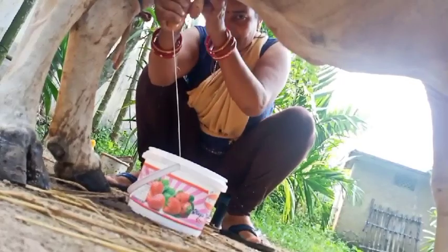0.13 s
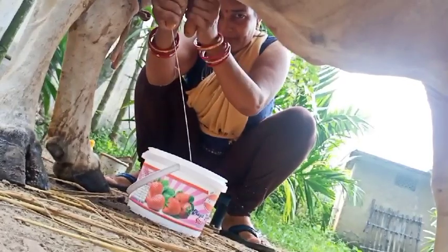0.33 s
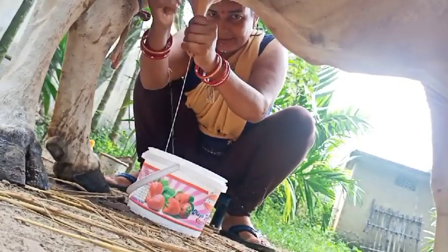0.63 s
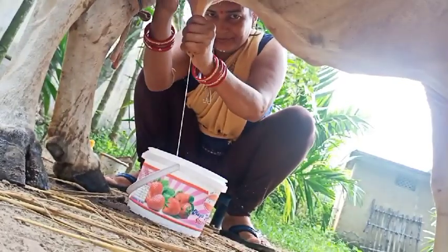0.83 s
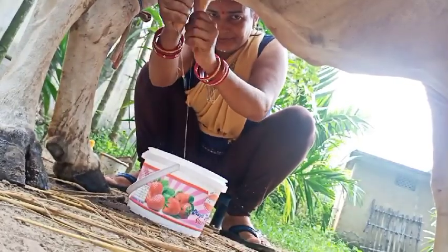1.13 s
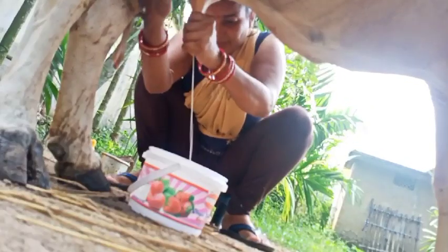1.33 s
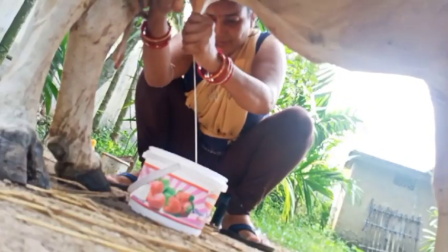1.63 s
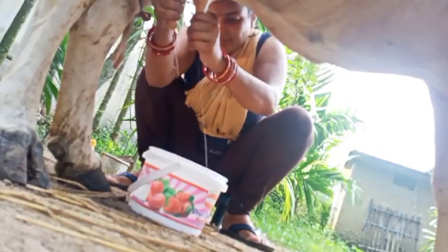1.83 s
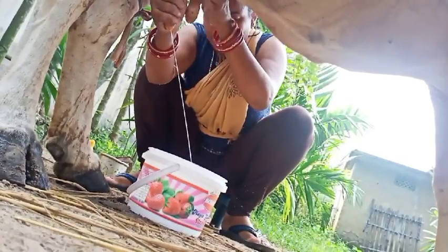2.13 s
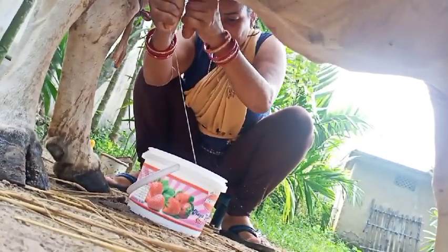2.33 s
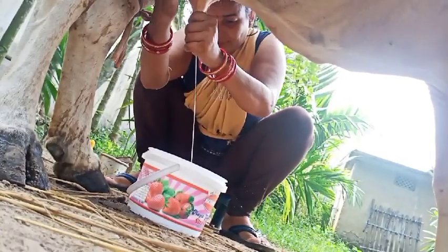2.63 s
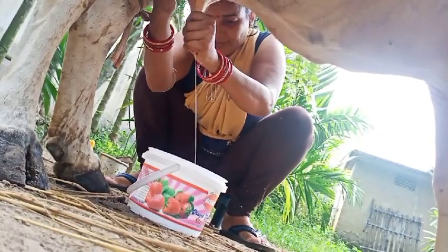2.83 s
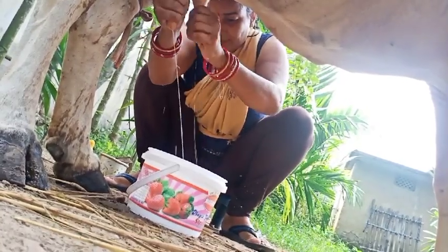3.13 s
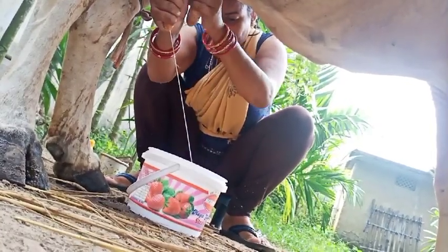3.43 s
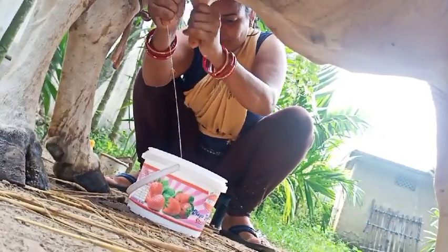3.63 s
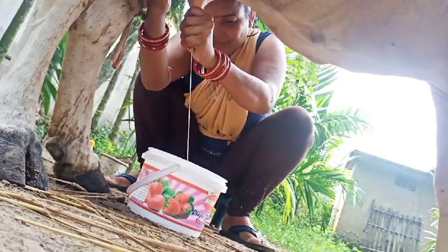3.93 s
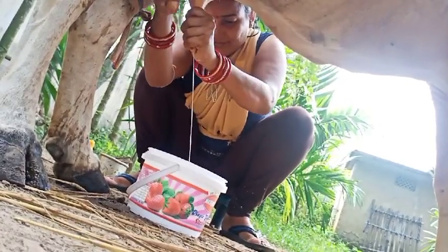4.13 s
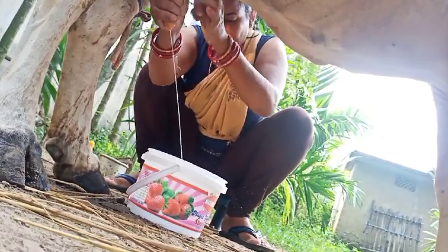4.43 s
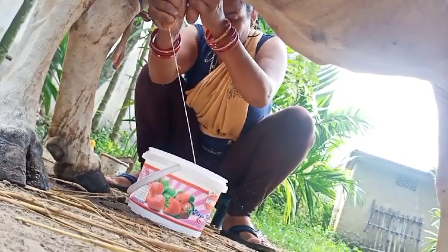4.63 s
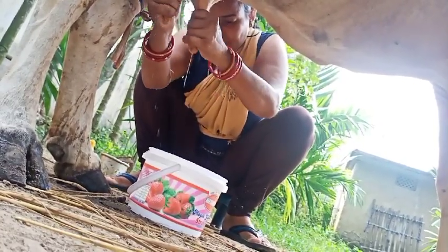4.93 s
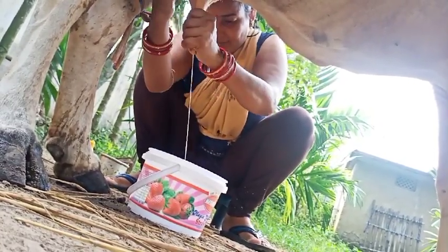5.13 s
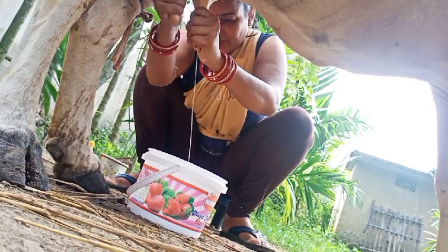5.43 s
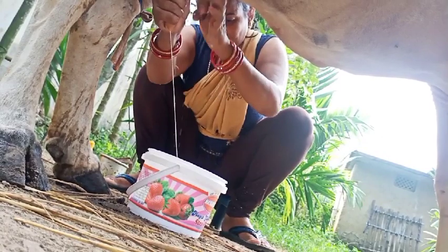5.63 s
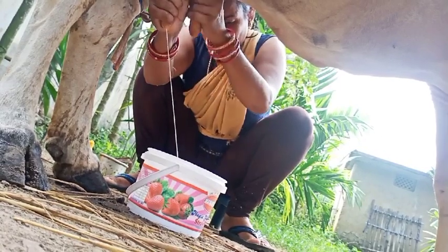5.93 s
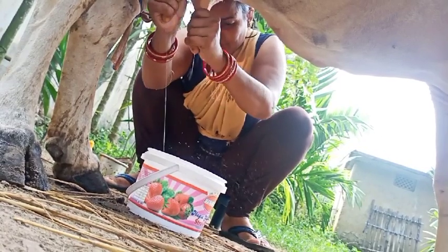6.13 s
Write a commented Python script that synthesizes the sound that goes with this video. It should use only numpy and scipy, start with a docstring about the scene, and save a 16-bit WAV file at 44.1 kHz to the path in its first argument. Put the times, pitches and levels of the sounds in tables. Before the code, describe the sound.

Milk jets squirt in uneven rhythmic spurts into a frothy plastic tub, with bangles clinking and soft open air behind, heard close up.

```python
"""Hand milking in an open shelter

A cow is milked by hand into a plastic tub, heard from close by, with soft open air and faint tones far off.
Each jet is noise-driven: random drops strike resonances of wall, froth and thin plastic, plus a fine spray.
Fat drops slap as noise bursts, single drips ring as short notes and the tub gives dull low knocks.
The bangles on the milker's wrists clink: ringing modes with bursts of coloured noise."""
import sys
import numpy as np
from scipy import signal
from scipy.fft import rfft, irfft
from scipy.io import wavfile
from scipy.ndimage import uniform_filter1d

SR = 44100
rng = np.random.default_rng(int(sys.argv[2]) if len(sys.argv) > 2 else 0)


def unload_audio(sound):
    """Save the sound as a 16-bit wav file, at the path given as the first command line argument."""
    columns = np.transpose(np.atleast_2d(sound))
    # keep every value between -1 and 1, then stretch to whole-number steps
    steps = np.round(np.clip(columns, -1, 1) * 32767)
    wavfile.write(sys.argv[1], SR, steps.astype(np.int16))


N = 276507
TIME = np.arange(N) / SR  # seconds

# Colour of the open air. Each row: frequency in Hz, relative level in dB per Hz.
AIR_COLOUR = [(25, -65), (70, 3), (150, -0.5), (350, -2), (600, -2.5), (1400, -4.5), (3500, -21),
              (5800, -17), (7000, -1.5), (8600, 1), (9400, -15.5), (13600, -26), (15200, -8), (15900, -37)]
AIR_DB = -56.5  # middle level of the air's hiss
# Low hum behind the shelter. Each row: time in seconds, level in dB.
HUM_LEVEL = [(0.0, -58), (1.5, -59), (1.7, -79), (3.2, -76), (4.3, -63), (6.27, -65)]
# Faint far tones. Each row: start in seconds, end in seconds, frequency in Hz, level in dB.
FAR_TONES = [(1.14, 1.207, 440, -56), (1.62, 1.67, 650, -41.5), (1.925, 1.975, 562.4, -47),
             (2.13, 3.02, 621.8, -53.5), (2.216, 2.625, 887, -57.5), (3.752, 3.995, 629, -46.5),
             (3.734, 3.93, 360, -52.5), (4.805, 4.97, 430.4, -54.5)]

# Resonances of the tub's floor, of its wall, of the air in it, and the thin wall's clearest high rings.
# Each row: frequency in Hz, width in Hz, relative level in dB.
FLOOR_MODES = [(154, 260, -5), (249, 62, 2.5), (360, 19, 0.5), (425, 37, -8)]
WALL_MODES = [(545, 55, -3.5), (569.4, 71, 5), (670, 80, 2.5), (755, 134, -7), (905, 156, -2.5)]
HOLLOW_MODES = [(1085, 80, -0.5), (1186, 430, -7.5), (1446, 103, 1.5), (1770, 213, -5), (2087, 237, -1),
                (2448, 410, -4), (2810, 730, -4.5)]
WALL_RING_MODES = [(2827, 60, 2), (4150, 104, 1), (6304, 106, 3.5), (7416, 110, 5.5)]
# Dull knocks of the tub. Each row: start in seconds, level in dB before rise and decay, pitch in Hz,
# time to fall by 60 dB in seconds.
TUB_KNOCKS = [(1.751, -31, 345, 0.16), (1.759, -37, 209, 0.11), (1.793, -33, 357, 0.12),
              (2.672, -32, 335, 0.14), (3.237, -38, 349, 0.06), (3.549, -28.5, 343, 0.12),
              (4.042, -27, 373, 0.13), (4.263, 0, 395, 0.01), (4.268, -20.5, 170, 0.049),
              (4.48, -42, 248.2, 0.27), (4.649, -30, 264, 0.19), (4.713, -29, 224, 0.096),
              (4.775, -26.5, 270, 0.083), (5.637, -40.5, 252, 0.24), (5.96, -27.5, 347, 0.11),
              (5.976, -24, 219, 0.031), (6.011, -26, 425, 0.049)]

# Touches of the bangles. Each row: start in seconds, then levels in dB of the clear ring,
# the hard clack and the high tinkle.
BANGLE_TOUCHES = [(0.121, -39, -42, -28), (0.1282, -27, -27, -31), (0.538, -37, -32, -32.5),
                  (0.545, -25, -19, -12), (0.564, -36, -12, -20), (1.13, -35.5, -38, -47),
                  (1.364, -50, -40, -18.5), (1.986, -29.5, -36, -48), (2.55, -48, -34, -33),
                  (2.568, -46, -12, -49), (3.305, -28.5, -32, -30), (3.745, -39, -36, -24),
                  (3.772, -34, -17.5, -26.5), (3.92, -63, -25.5, -43), (4.402, -34.5, -33, -46),
                  (4.472, -37, -32, -19.5), (4.921, -41, -31, -22.5), (4.9355, -33, -29, -24),
                  (4.962, -27.5, -13, -28), (5.743, -29, -30, -19.5), (6.159, -53, -22, -30),
                  (6.165, -29, -17, -16.5), (6.203, -35, -11, -36)]
# Clear modes of a bangle. Each row: frequency in Hz, relative level in dB, time to fall by 60 dB in seconds.
BANGLE_MODES = [(6710, 0, .085), (12810, -5, .05)]
# Colours of clack and tinkle, with the microphone's own peak near 15 kHz.
# Each row: frequency in Hz, relative level in dB per Hz.
CLACK_COLOUR = [(2000, -19.5), (4800, -8.5), (6200, 6), (7500, 10.5), (8500, 10.5), (9500, 2), (10600, 1.5),
                (13000, -23), (16000, -10)]
TINKLE_COLOUR = [(10000, -14), (13800, 10), (14500, -5), (15200, 30), (15500, 8), (15900, -25)]
RATTLE_DB = -13  # start of the rattle, relative to the peak of the clack's envelope

# Single bubbles and drips around the spurts. Each row: start in seconds, level in dB before rise and decay,
# pitch in Hz.
DRIPS = [(0.15, -36, 3330), (0.714, -44, 2480), (0.748, -37, 2805), (1.166, -46, 1430), (2.574, -53, 1440),
         (2.797, -24, 1090), (3.025, -38.5, 1050), (3.104, -44, 1400), (3.742, -44, 1287)]
# Fat drops and short gushes on the plastic. Each row: start in seconds, relative level in dB,
# centre of the note in Hz, decay time constant in seconds.
FAT_DROPS = [(0.034, -27.5, 6970, 0.0041), (0.244, -20, 2290, 0.0073), (0.299, -19.5, 2130, 0.0097),
             (0.384, -18, 1220, 0.0028), (0.411, -18, 6200, .004), (0.824, -12, 1940, 0.0096),
             (0.847, -12, 1690, .004), (0.884, -18.5, 700, 0.012), (0.958, -19, 2830, .005),
             (1.052, -15, 1390, .008), (1.408, -19.5, 3000, 0.022), (2.155, -16.5, 7330, 0.0053),
             (2.166, -19, 3180, 0.0065), (2.189, -17.5, 7300, 0.0024), (2.217, -23, 1930, 0.013),
             (2.249, -15.5, 10300, 0.0045), (2.266, -19.5, 6500, 0.0046), (2.882, -10.5, 2130, 0.018),
             (2.939, -17.5, 7100, 0.017), (3.289, -31, 7500, 0.0058), (3.415, -14, 660, 0.0053),
             (3.492, -19, 1310, .004), (3.573, -12.5, 5760, 0.002), (3.957, -15.5, 8940, 0.0044),
             (3.99, -11, 2190, 0.012), (4.194, -8, 2010, 0.014), (4.637, -16.5, 660, 0.0059),
             (4.669, -11, 2540, .003), (4.716, -8.5, 2140, 0.0065), (4.784, -13, 1680, 0.0021),
             (5.184, -13, 7160, 0.007), (5.231, -10, 2060, 0.0088), (5.257, -11.5, 7040, 0.024),
             (5.304, -9, 2080, 0.0045), (5.783, -13, 6950, 0.0028), (6.003, -12.5, 620, 0.008)]

# Colours of splash and spray, with the microphone's own peak near 15 kHz.
# Each row: frequency in Hz, relative level in dB per Hz.
SPLASH_COLOUR = [(1800, -23.5), (2900, 1.5), (3900, -0.5), (4800, 2), (6000, 9), (7400, 8), (8500, 1.5),
                 (9800, -23), (12000, -25)]
SPRAY_COLOUR = [(7000, 2), (9300, -13), (11000, -12.5), (12500, -20), (13800, -13), (14600, -1),
                (15300, 8.5), (15600, 2), (15950, -30), (17000, -58)]
# One spurt for each pull on a teat (a few break in two), with weak dribbles between.
# Each row: start of full flow in seconds, time held in seconds, then relative levels in dB at mid-spurt of
# drumming, churning, splash and fine spray, sag in dB per second (each part adds its own),
# seconds until the jet is fully in the froth (negative: it plunges in sooner), the pit's pitch in Hz
# at mid-spurt and its relative level in dB, treble and crackle of the splash in dB.
TEAT_PULLS = [(0.02, 0.024, -62, -52.5, -55.5, -62, 0, -0.0039, 1410, -30, 5, 2),
              (0.204, 0.07, -45, -34, -40, -40, -13, 0.037, 2140, -11, 2.5, -1),
              (0.315, 0.1, -40.5, -36.5, -38.5, -42.5, 12, -0.018, 1350, -8, 2, 3),
              (0.484, 0.062, -85, -42.5, -49.5, -52, 10, -0.012, 2250, 8, 2.5, 2),
              (0.803, 0.077, -44, -27, -29.5, -41.5, 3, 0.039, 1620, -19, 2.5, -1.5),
              (0.952, 0.13, -49.5, -31.5, -39, -49, 80, 0.003, 1400, -5, 2, 3),
              (1.15, 0.042, -57.5, -55.5, -75, -66, 63, 0.003, 1400, -5, 15, -4),
              (1.355, 0.045, -66, -37, -43.5, -49, 5, -0.039, 2210, 11, -2, 9),
              (1.42, 0.12, -70, -31, -40.5, -41, -7, -0.005, 2240, 1.5, 1, 0),
              (1.691, 0.14, -50.5, -31.5, -46, -46, -10, -0.022, 2160, 1, 7, 4),
              (2.1, 0.01, -58.5, -53, -59, -58, 2, -0.046, 2180, 4, 11, 4),
              (2.158, 0.1, -58, -44.5, -40, -41, 12, 0.011, 1500, -12, -1, 1),
              (2.322, 0.072, -46.5, -32.5, -44, -51, 57, 0.007, 1690, -2, -2, -7),
              (2.753, 0.2, -46.5, -27.5, -41, -41, -18, -0.02, 2050, 0.5, 9, -3),
              (3.005, 0.044, -58.5, -36.5, -49, -52, 64, 0.003, 2130, 4.5, 7, 5),
              (3.148, 0.059, -69, -55.5, -53.5, -52, -13, 0.005, 2400, 1, 6, -1),
              (3.317, 0.17, -32, -34, -43.5, -39, -4, 0.05, 1390, -16, -0.5, 2),
              (3.539, 0.032, -40.5, -36.5, -39, -70, 3, 0.02, 1430, -12, 0, -1),
              (3.978, 0.23, -31, -30, -36, -38.5, 2, 0.012, 1990, -3.5, 3, 4.5),
              (4.523, 0.13, -34, -34.5, -36.5, -34, -64, 0.034, 2380, -9, -9, -2),
              (4.719, 0.048, -47, -32, -35.5, -65, 29.5, 0.0028, 2340, -11, -7, 1),
              (5.19, 0.27, -23, -19.5, -35.5, -39.5, 26, 0.097, 2157, -4, -7, -1),
              (5.76, 0.32, -35, -36, -45, -47.5, 15, 0.019, 2110, -29, -1.5, -5)]
# How each part follows a pull: attack in seconds, release time constant in seconds, extra sag in dB per
# second, and level in dB of the thin thread that runs ahead of the jet.
DRUM_SWELL = dict(attack_s=0.06, release_s=.046, sag_db_per_s=-11, thread_db=-29)
CHURN_SWELL = dict(attack_s=0.065, release_s=0.037, sag_db_per_s=16, thread_db=-31)
SPLASH_SWELL = dict(attack_s=0.071, release_s=0.045, sag_db_per_s=-3, thread_db=-8.5)
SPRAY_SWELL = dict(attack_s=0.071, release_s=0.067, sag_db_per_s=2, thread_db=-1)
THREAD_LEAD_S = 0.041  # time constant of the thread's growth
PIT_RISE_HZ_PER_S = 520  # the pit's note climbs while the jet digs into the froth
BRIGHT_FROM_HZ = 6430  # above this, the splash brightens or dulls with the spot that the jet hits
CRACKLE_UP_TO_HZ = 4840  # below this lies its crackle
STOP_FROM_HZ = 16800  # from here up, the sound is cut by at least 60 dB


def from_db(db):
    """Decibels to gain."""
    return 10 ** (np.asarray(db) / 20)


def rms_one(x):
    """Scale to unit rms."""
    return x / np.sqrt(np.mean(x ** 2) + 1e-20)


def level(rows, fade_s=0.004):
    """Gain along a curve of (s, dB), fading out beyond its ends."""
    rows = np.array(rows)
    outside = np.maximum(0, np.maximum(rows[0, 0] - TIME, TIME - rows[-1, 0]))
    return from_db(np.interp(TIME, rows[:, 0], rows[:, 1])) * np.exp(-outside / fade_s)


def drift(rate):
    """Random line of unit rms with `rate` new values a second, joined by straight slopes."""
    knots = rng.standard_normal(4096)
    return rms_one(np.interp(TIME * rate, np.arange(len(knots)), knots))


def band(x, low_hz, high_hz, order=2):
    """Butterworth band-pass."""
    sos = signal.butter(order, [low_hz, high_hz], "band", fs=SR, output="sos")
    return signal.sosfilt(sos, x + 1e-18)


def split(x, hz):
    """The parts below and above a frequency."""
    return [signal.sosfilt(signal.butter(3, hz, kind, fs=SR, output="sos"), x) for kind in ("low", "high")]


def colour(x, spectrum):
    """Causal (minimum-phase) filter with the given spectrum, made by folding its cepstrum."""
    hz, db = np.transpose(spectrum)
    size = 4096
    grid = np.arange(size // 2 + 1) * SR / size + 1
    gain = from_db(np.interp(np.log(grid), np.log(hz), db))
    cepstrum = irfft(np.log(gain))
    cepstrum[1:size // 2] *= 2
    cepstrum[size // 2 + 1:] = 0
    response = irfft(np.exp(rfft(cepstrum)))
    return signal.oaconvolve(x, response)[:N]


def resonate(x, hz, width_hz):
    """Two-pole resonance with gain about 1 on top."""
    r = np.exp(-np.pi * width_hz / SR)
    zeros = np.array([1, 0, -1]) * (1 - r * r) / 2
    poles = [1, -2 * r * np.cos(2 * np.pi * hz / SR), r * r]
    return signal.lfilter(zeros, poles, x + 1e-18)


def outdoors(tone_width_hz=22, hum_hz=66, hum_width_hz=16):
    """Open air as coloured noise, a low hum as resonant noise and faint blurred tones from far off."""
    air = rms_one(colour(rng.standard_normal(N), AIR_COLOUR))
    out = from_db(AIR_DB + drift(24)) * air
    hum = resonate(rng.standard_normal(N), hum_hz, hum_width_hz)
    out += level(HUM_LEVEL) * rms_one(resonate(hum, hum_hz, hum_width_hz))
    for start, end, hz, db in FAR_TONES:
        haze = rms_one(band(rng.standard_normal(N), hz - tone_width_hz, hz + tone_width_hz))
        tone = np.sin(2 * np.pi * hz * TIME) + 0.5 * haze
        out += level([(start, db), (end, db)], fade_s=0.015) * tone
    return out


def shelter(x, t60=0.061, wet_db=-15.5, gap_s=0.0051):
    """Short, thin scatter from the ground, the cow and the roof, as decaying noise after a gap."""
    t = TIME[:SR // 2]
    noise = band(rng.standard_normal(len(t)), 370, 5400, order=1)
    echoes = noise * from_db(-60 * t / t60) * (t > gap_s)
    return x + from_db(wet_db) * signal.fftconvolve(x, echoes / np.linalg.norm(echoes))[:N]


def knocks(rise_s=0.0048, rough=0.49, slosh_spread=1.32):
    """Soft blows on the tub: one low, quickly damped note each, blurred by the sloshing milk."""
    out = np.zeros(N)
    for s, db, hz, t60 in TUB_KNOCKS:
        start = int(s * SR)
        t = TIME[:N - start][:SR // 3]
        slosh = rms_one(band(rng.standard_normal(len(t)), hz / slosh_spread, hz * slosh_spread))
        note = np.sin(2 * np.pi * hz * t) + rough * slosh
        out[start:start + len(t)] += from_db(db - 60 * t / t60) * (1 - np.exp(-t / rise_s)) * note
    return out


def bangles(clack_s=0.00084, rattle_s=0.012, tinkle_rise_s=0.0013, tinkle_s=0.01, tinkle_body_db=-9,
            ring_rise_s=0.0011):
    """Stacked rings touch: a hard clack with a short rattle, a softer high tinkle, and one ring sounds on."""
    out, t = np.zeros(N + SR), TIME[:SR // 6]
    strike = t / clack_s * np.exp(1 - t / clack_s) + from_db(RATTLE_DB) * np.exp(-t / rattle_s)
    chatter = (1 - np.exp(-t / tinkle_rise_s)) * np.exp(-t / tinkle_s)
    for s, ring_db, clack_db, tinkle_db in BANGLE_TOUCHES:
        ring = np.zeros(len(t))
        for hz, db, t60 in BANGLE_MODES:
            touched_hz = hz + rng.normal(0, 29)  # each touch is tuned a little differently
            ring += from_db(db - 60 * t / t60) * np.sin(2 * np.pi * touched_hz * t)
        clink = from_db(ring_db) * (1 - np.exp(-t / ring_rise_s)) * ring
        bursts = [(clack_db, CLACK_COLOUR, strike),
                  (tinkle_db, TINKLE_COLOUR, chatter),
                  (tinkle_db + tinkle_body_db, CLACK_COLOUR, chatter)]
        for db, spectrum, shape in bursts:
            touch = colour(rng.standard_normal(len(t)) * shape, spectrum)[:len(t)]
            clink += from_db(db) * touch / np.abs(touch).max()
        start = int(s * SR)
        out[start:start + len(t)] += clink
    return band(out[:N], 1100, 19845)


def plinks(t60=0.16, rise_s=0.0044, rough=0.31):
    """Bubbles and drips: one short decaying note each, blurred by the moving milk."""
    out, t = np.zeros(N + SR), TIME[:SR // 5]
    for s, db, hz in DRIPS:
        blur = rms_one(resonate(rng.standard_normal(len(t)), hz, hz / 10))
        note = np.sin(2 * np.pi * hz * t) + rough * blur
        start = int(s * SR)
        out[start:start + len(t)] += from_db(db - 60 * t / t60) * (1 - np.exp(-t / rise_s)) * note
    return out[:N]


def slaps(gain_db=-5.0, rise_share=0.16, spread=1.145, crack_db=-9):
    """A fat drop bursts with a broad crackle and a short note; the longer the gush, the softer its start."""
    out, t = np.zeros(N + SR), TIME[:SR // 8]
    for s, db, hz, decay_s in FAT_DROPS:
        shape = (1 - np.exp(-t / (rise_share * decay_s))) * np.exp(-t / decay_s)
        shower = rng.standard_normal(len(t)) * shape
        note = band(shower, hz / spread, hz * spread)
        crack = band(shower, hz / 2, 8500)
        burst = note / np.abs(note).max() + from_db(crack_db) * crack / np.abs(crack).max()
        start = int(s * SR)
        out[start:start + len(t)] += from_db(db + gain_db) * burst
    return out[:N]


def tub(force, modes, wander_db, wander_rate):
    """The tub's resonances answer side by side; as the jet wanders, each swells and fades on its own."""
    out = np.zeros(N)
    for k, (hz, width_hz, db) in enumerate(modes):
        gain = from_db(db + wander_db * drift(wander_rate))
        out += (-1) ** k * gain * resonate(force, hz, width_hz)  # neighbours with opposite sign
    return out


def tub_floor(drumming, floor_db=-26.0):
    """The floor of the tub shudders under the weight of the jet: low noise through its resonances."""
    rumble = band(rng.standard_normal(N), 120, 450)
    shudder = rms_one(tub(rumble, FLOOR_MODES, wander_db=4.0, wander_rate=14))
    return from_db(floor_db) * drumming * shudder


def flow(attack_s, release_s, sag_db_per_s, thread_db, in_froth=False):
    """Each squeeze swells, sags or grows, then dies away.

    Deep sounds swell later or sooner than splash and spray, as the jet reaches the froth."""
    swells = []
    for start, held, *_, sag, settle_s, _, _, _, _ in TEAT_PULLS:
        t = TIME - start
        rise_s = max(attack_s + in_froth * settle_s, 1 / SR)
        rise = np.clip((t + attack_s) / rise_s, 0, 1) ** 2
        thread = from_db(thread_db) * np.exp(np.minimum(t, 0) / THREAD_LEAD_S)
        hold_db = -(sag + sag_db_per_s) * (np.clip(t, 0, held) - held / 2)
        release = np.exp(-np.maximum(t - held, 0) / release_s)
        swells.append(np.maximum(rise, thread) * from_db(hold_db) * release)
    return np.array(swells)


def jets():
    """Strength over time of drumming, churning, splash and spray, the pulls added by power."""
    _, _, drum_db, churn_db, splash_db, spray_db, *_ = np.transpose(TEAT_PULLS)
    parts = [(drum_db, flow(**DRUM_SWELL, in_froth=True)),
             (churn_db, flow(**CHURN_SWELL, in_froth=True)),
             (splash_db, flow(**SPLASH_SWELL)),
             (spray_db, flow(**SPRAY_SWELL))]
    return [np.sqrt(from_db(db) ** 2 @ swell ** 2) for db, swell in parts]


def drops(per_s, spread_db):
    """Random impacts of uneven size and either sign."""
    sizes = from_db(spread_db * np.minimum(rng.exponential(1, N), 4)) * rng.choice([-1, 1], N)
    return sizes * (rng.random(N) < per_s / SR)


def bubbles(low_hz, high_hz, per_s, cycles, count=18):
    """Each bubble rings for some cycles at a pitch set by its size, dealt from `count` sizes."""
    births = drops(per_s, spread_db=5.0)
    dealt = rng.integers(0, count, N)
    out = np.zeros(N)
    for k, hz in enumerate(np.geomspace(low_hz, high_hz, count)):
        out += resonate(births * (dealt == k), hz, hz / cycles) / np.sqrt(hz)
    return rms_one(out)


def steady(x, window_s=0.037):
    """Unit level over the longer run; the fast grain stays."""
    power = uniform_filter1d(x * x, int(window_s * SR) + 1)
    return x / np.sqrt(np.abs(power) + 0.0019 * np.mean(x * x))


def crowd(low_hz, high_hz, width_hz, count):
    """Many irregularly spaced high modes of equal level: (Hz, width Hz, dB)."""
    places = (np.arange(count) + rng.random(count)) / count
    return [(low_hz + (high_hz - low_hz) * place, width_hz, 0) for place in places]


def pit(force, width_hz=290, wander_hz=55):
    """Each jet digs a pit in the froth, whose note wobbles and rises through the pull."""
    points = []
    for start, held, *_, hz, db, _, _ in TEAT_PULLS:
        for part in (0, 1):
            points.append((start + part * held, hz + (part - 0.5) * held * PIT_RISE_HZ_PER_S, db))
    s, hz, db = np.transpose(points)
    pitch = np.interp(TIME, s, hz) + wander_hz * drift(20)
    turn = np.exp(2j * np.pi * np.cumsum(pitch) / SR)
    # shift the pitch down to zero, low-pass, shift back: a band-pass that follows the pitch
    lowpass = signal.butter(2, width_hz / 2, fs=SR, output="sos")
    note = signal.sosfilt(lowpass, force / turn) * turn
    return from_db(np.interp(TIME, s, db)) * rms_one(note.real)


def brighten(x):
    """Each spurt lands on another spot, which gives its splash more or less treble and crackle."""
    points = [(at, treble, crackle) for start, held, *_, treble, crackle in TEAT_PULLS
              for at in (start, start + held)]
    s, treble_db, crackle_db = np.transpose(points)
    low, high = split(x, BRIGHT_FROM_HZ)
    low, middle = split(low, CRACKLE_UP_TO_HZ)
    return from_db(np.interp(TIME, s, crackle_db)) * low + middle + from_db(np.interp(TIME, s, treble_db)) * high


def milk(drumming, churning, splashing, spraying, sputter_db=1.2, spray_sputter_db=1.5, surge_db=1.4,
         splash_gain_db=2.0):
    """The jet arrives in uneven slugs of drops, which drive wall, froth and spray together."""
    surge = from_db(surge_db * drift(28))
    slugs = from_db(sputter_db * drift(130))
    spurts = slugs * from_db(spray_sputter_db * drift(70))
    # heavy drops drum on the wall
    heavy = slugs * drops(1200, spread_db=1.5)
    drum = band(tub(heavy, WALL_MODES, wander_db=5.0, wander_rate=14), 490, 1170, order=3)
    # drops and bubbles in the froth sound the hollow of the tub and the jet's own pit
    froth_bubbles = bubbles(980, 2900, per_s=700, cycles=34)
    froth = slugs * (rms_one(drops(3600, spread_db=2.0)) + 0.45 * froth_bubbles)
    hollow = band(tub(froth, HOLLOW_MODES, wander_db=2.5, wander_rate=14), 480, 4800)
    churn = rms_one(hollow) + pit(froth)
    # small drops patter on the thin plastic
    fizz_bubbles = bubbles(2600, 8800, per_s=900, cycles=35)
    fizz = spurts * (rms_one(drops(3600, spread_db=4.3)) + 0.45 * fizz_bubbles)
    plastic = crowd(2640, 9472, width_hz=114, count=44) + WALL_RING_MODES
    patter = tub(fizz, plastic, wander_db=5.0, wander_rate=22)
    splash = brighten(colour(patter, SPLASH_COLOUR))
    # the finest drops hiss
    mist = spurts * drops(5000, spread_db=4.5)
    hiss_modes = crowd(8450, 16300, width_hz=410, count=20)
    spray = colour(tub(mist, hiss_modes, wander_db=5.0, wander_rate=25), SPRAY_COLOUR)
    deep = drumming * steady(drum) + churning * steady(churn)
    high = from_db(splash_gain_db) * splashing * steady(splash) + spraying * steady(spray)
    return surge * (deep + high)


def scene():
    """Milking close by, the yard behind."""
    drumming, churning, splashing, spraying = jets()
    near = knocks() + bangles() + plinks() + slaps() + tub_floor(drumming)
    near += milk(drumming, churning, splashing, spraying)
    return (outdoors() + shelter(near))[None]


def record(dry):
    """The top is cut steeply by a low-pass."""
    return signal.sosfilt(signal.cheby2(16, 60, STOP_FROM_HZ, fs=SR, output="sos"), dry)


dry = scene()
out = record(dry)
unload_audio(out)
```